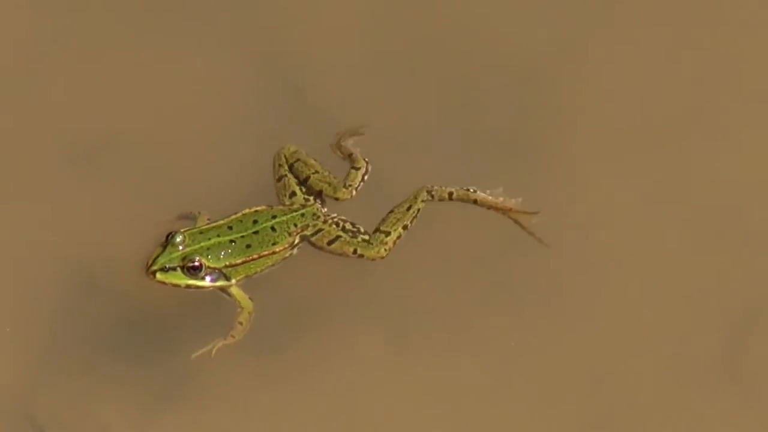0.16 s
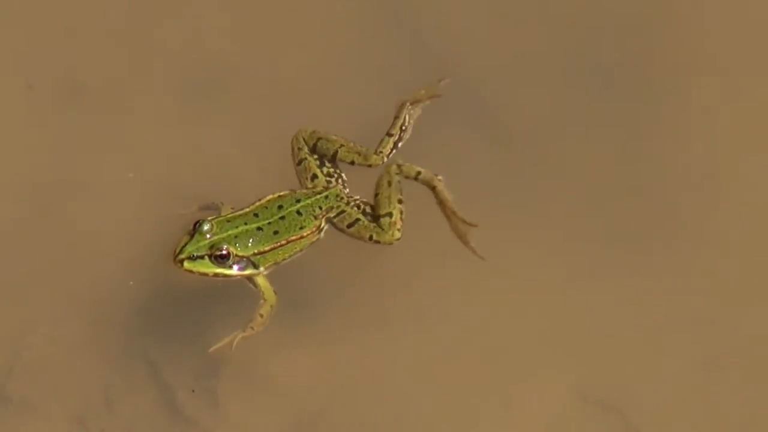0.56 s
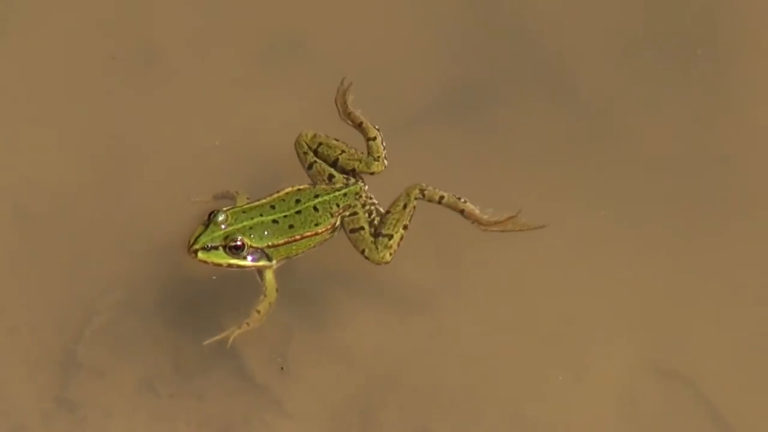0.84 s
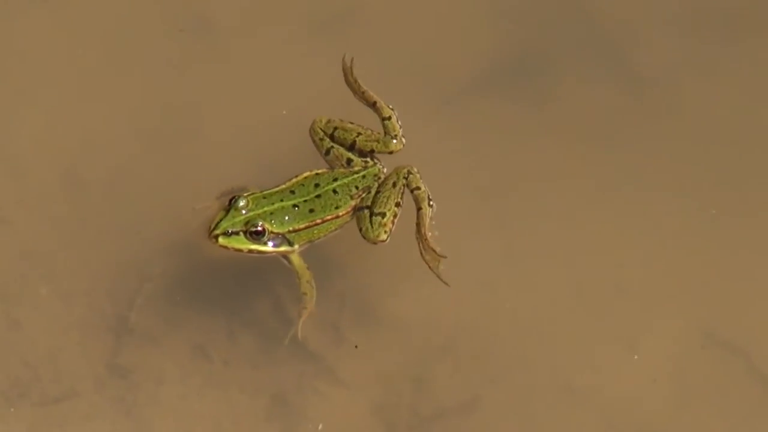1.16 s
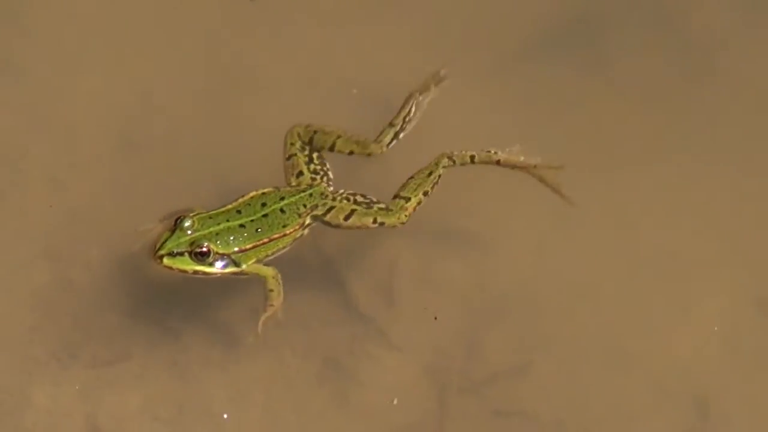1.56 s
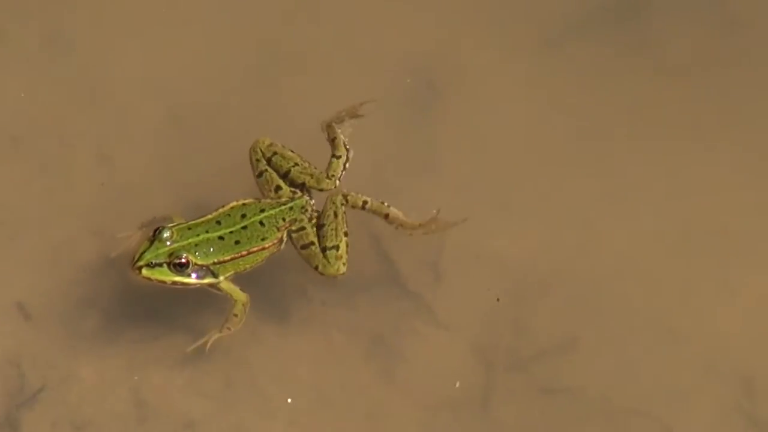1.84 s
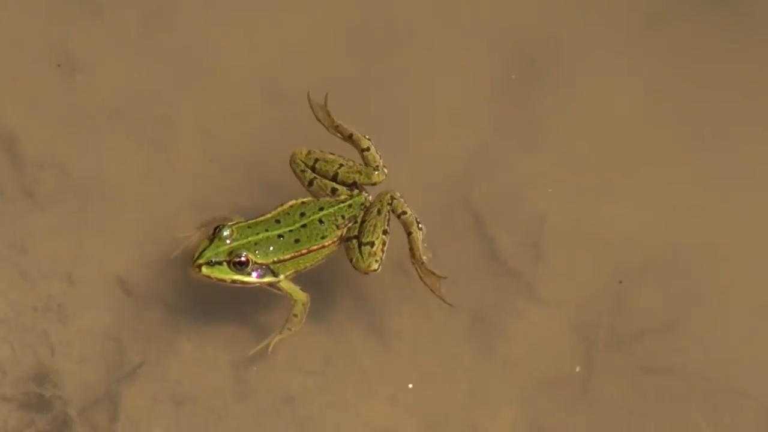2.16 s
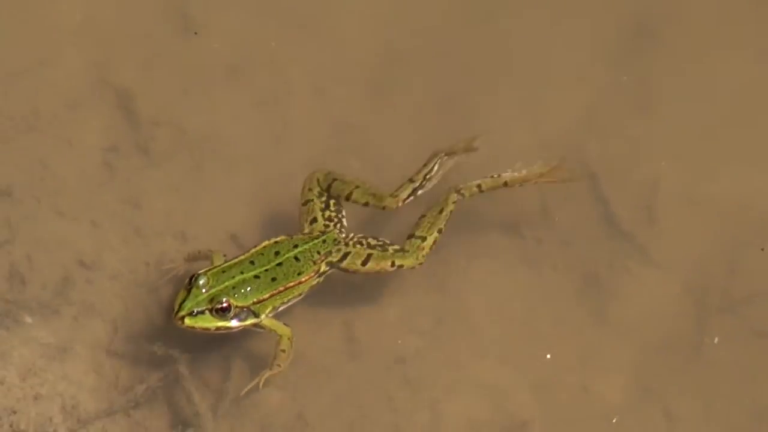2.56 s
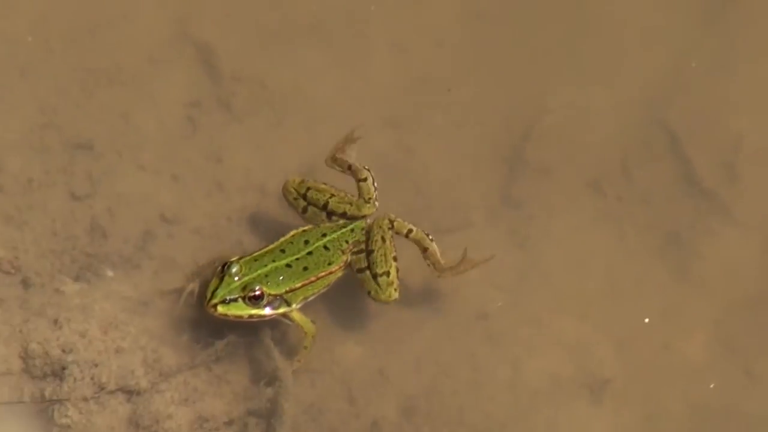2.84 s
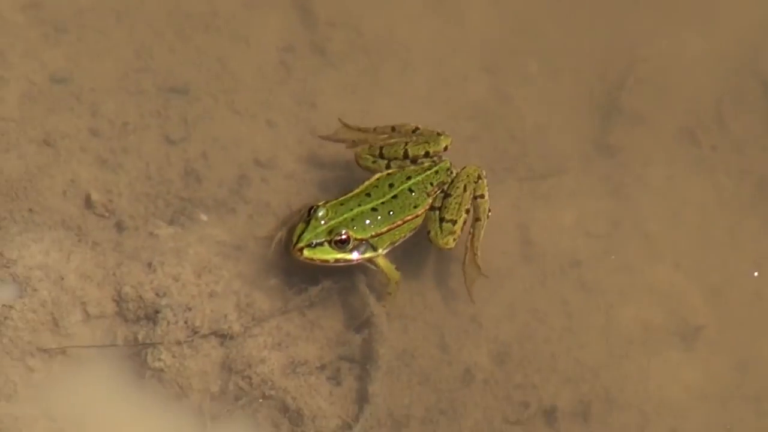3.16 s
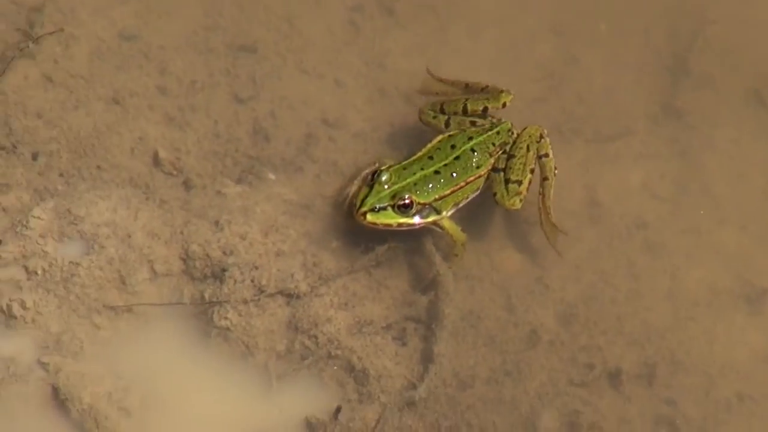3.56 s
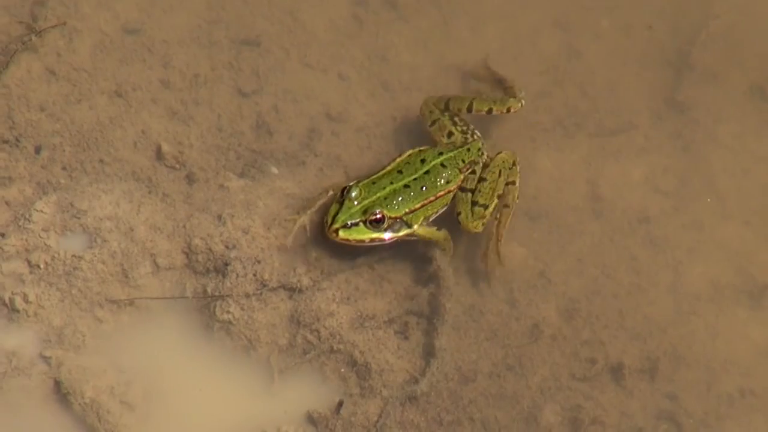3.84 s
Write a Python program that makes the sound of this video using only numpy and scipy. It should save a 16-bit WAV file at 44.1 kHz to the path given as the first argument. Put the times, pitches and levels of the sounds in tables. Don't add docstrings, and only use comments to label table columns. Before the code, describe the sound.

Frogs give short, low, rattling croaks at a pond while several birds whistle and twitter.

```python
import sys
import numpy as np
from scipy import signal
from scipy.fft import rfft, irfft
from scipy.io import wavfile
from scipy.ndimage import uniform_filter1d

SR = 44100
rng = np.random.default_rng(int(sys.argv[2]) if len(sys.argv) > 2 else 0)


def makeup_ratio(level_db):
    decades = np.asarray(level_db, float) / 20
    return 10 ** decades


def transcribe(signal):
    frames = np.atleast_2d(signal).T
    limited = np.clip(frames, -1, 1)
    pcm = np.round(limited * 32767).astype(np.int16)
    wavfile.write(sys.argv[1], SR, pcm)


N = 176400


def noise(hz, width):
    f = np.fft.rfftfreq(N, 1 / SR)
    bell = np.exp(-2 * ((f - hz) / width) ** 2)
    x = irfft(rfft(rng.standard_normal(N)) * bell, N)
    return x / x.std()


def frog(calls, lone, throat_db):
    # share of the sac pitch, t60/s, level/dB
    sac = [
        (0.991, 0.013, 3.5),
        (1.55, 0.008, -4),
        (0.592, 0.0076, -3),
    ]
    throat_hz, throat_t60_s = 550, 0.018
    open_s, close_s = 0.0015, 0.0008
    jitter, uneven_db = .04, 1.5

    pulses = [(s, f, db, db, N) for s, f, db in lone]
    for call in calls:
        when, rate_hz, sac_hz, db = np.array(call).T
        u = np.linspace(when[0], when[-1], 2000)
        turns = np.cumsum(np.interp(u, when, rate_hz)) * (u[1] - u[0])
        at = np.interp(turns[-1] - np.arange(int(turns[-1])), turns, u)
        progress = (at - when[0]) / (when[-1] - when[0])
        late = np.interp(progress, [.55, .7], [.3, 1])
        chance = rng.standard_normal((140, 2))[:len(at)].T * late
        starts = at + jitter * chance[0] / np.interp(at, when, rate_hz)
        levels = np.interp(at, when, db) + uneven_db * chance[1]
        stop = starts[0] + open_s
        pitches = np.interp(at, when, sac_hz)
        pulses += [(s, f, d, db.max(), stop) for s, f, d in zip(starts, pitches, levels)]

    out = np.zeros(N + 2048)
    ring_time = np.arange(2048) / SR
    for when, f, db, top_db, stop in pulses:
        i = int(when * SR)
        r = ring_time + (i + 1) / SR - when
        modes = [(share * f, t60, d) for share, t60, d in sac]
        modes.append((throat_hz, throat_t60_s, throat_db + (top_db - db) / 2))
        rings = sum(makeup_ratio(d - 60 * r / t60) * np.sin(2 * np.pi * hz * r) for hz, t60, d in modes)
        opening = 1 - np.exp(-(r / open_s) ** 2)
        shut = np.exp(-np.maximum(when + r - stop, 0) / close_s)
        out[i + 1:i + 2049] += 2 * makeup_ratio(db) * opening * rings * shut
    return signal.sosfilt(signal.butter(4, 494, "high", fs=SR, output="sos"), out[:N])


def left_frog():
    # t/s, pulse rate/Hz, sac f/Hz, level/dB
    calls = [
        [(1.92, 550, 1100, -60), (1.96, 570, 1128, -48), (1.982, 616, 1230, -32.5), (1.988, 351.5, 1070, -28.5),
         (2.002, 306, 1200, -30), (2.013, 198, 1450, -23)],
        [(2.058, 944, 960, -57.5), (2.12, 1010, 1000, -56), (2.14, 980, 990, -60), (2.19, 1057, 1043, -52)],
        [(2.335, 243.4, 800, -45), (2.39, 332, 1000, -41.5), (2.427, 387, 1150, -25.5), (2.44, 338, 1132, -26),
         (2.453, 335.8, 1333, -17), (2.477, 279.2, 1417, -28)],
        [(3.625, 225.2, 850, -60), (3.665, 349, 1036, -34), (3.7, 363.5, 1100, -22), (3.716, 328.6, 1250, -21),
         (3.726, 305.7, 1340, -16), (3.7475, 257, 1500, -20)],
    ]
    # t/s, sac f/Hz, level/dB
    lone = [
        (2.019, 1416, -31),
        (2.029, 1100, -33),
        (2.482, 1490, -24),
        (2.493, 1473, -25),
        (3.757, 1472, -22),
        (3.768, 1336, -27),
        (3.781, 1350, -37),
    ]
    return frog(calls, lone, -17)


def right_frog():
    # t/s, pulse rate/Hz, sac f/Hz, level/dB
    calls = [
        [(1.33, 220, 800, -44), (1.38, 239, 738, -39), (1.395, 246.4, 760, -32), (1.415, 224.4, 980, -34.5),
         (1.437, 191, 1070, -32)],
        [(2.61, 470, 950, -56), (2.68, 502, 999, -50), (2.7, 509, 990, -34), (2.708, 266.6, 1050, -31.5),
         (2.722, 200, 1170, -28), (2.733, 165, 1160, -31)],
    ]
    # t/s, sac f/Hz, level/dB
    lone = [
        (1.448, 1036, -34.5),
        (1.474, 1072, -47),
        (2.742, 1100, -32),
        (2.748, 1117, -39),
    ]
    return frog(calls, lone, -9)


def gate(t, start, end):
    edge_s = .008
    return np.clip((t - start) / edge_s + .5, 0, 1) - np.clip((t - end) / edge_s + .5, 0, 1)


def whistle(t, notes):
    slur_s, waver_hz, flutter_db = .008, 34, 2.2
    rows = np.array(notes)
    hz = np.interp(t, np.maximum.accumulate(rows[:, :2].ravel()), rows[:, 2:4].ravel())
    hz = uniform_filter1d(hz, int(slur_s * SR)) + waver_hz * noise(0, 82.2)
    loud = sum(makeup_ratio(db) * gate(t, start, end) for start, end, _, _, db in notes)
    loud = loud * makeup_ratio(flutter_db * noise(0, 140))
    return np.sqrt(2) * loud * np.sin(2 * np.pi * np.cumsum(hz) / SR)


def warbler(t):
    # start t/s, end t/s, from f/Hz, to f/Hz, level/dB
    melody = [(.0, 0.057, 2790, 2475, -52.5), (.525, .548, 1350, 1642, -65),
              (0.548, 0.641, 1642, 1762, -53.5), (0.661, 0.826, 1860, 1906, -52.5),
              (.99, 1.098, 2758, 2390, -50), (1.208, 1.378, 2370, 2353, -55.5),
              (1.56, 1.663, 2030, 1996, -66.5), (1.662, 1.682, 1347, 1850, -51.5),
              (1.7, 1.78, 1956, 1930, -55.5),
              (2.112, 2.155, 2240, 2330, -43), (2.15, 2.207, 2330, 2125, -37),
              (2.215, 2.32, 2230, 2332, -49), (2.33, 2.42, 1970, 1952, -47.5), (2.65, 2.72, 2130, 2300, -46),
              (2.72, 2.773, 2382, 2605, -41.5), (2.772, 2.791, 2650, 3015, -41),
              (2.79, 2.823, 2970, 2267, -37), (2.826, 2.879, 2278, 1892, -45),
              (3.22, 3.249, 2400, 2384, -49.5), (3.26, 3.399, 2236, 2117, -41.5),
              (3.4, 3.546, 2097, 2090, -48.5), (3.55, 3.703, 2005, 2110, -57)]
    return whistle(t, melody)


def trill(t, count=7):
    start_s, rate_hz, pitch_hz, sag_hz = 1.925, 47.3, 2520, 300
    k = (t - start_s) * rate_hz
    hz = pitch_hz - sag_hz * np.clip(k / (count - 1), 0, 1) ** 4
    pips = np.exp(-((k - np.round(k)) / 0.14) ** 2) * (k > -.5) * (k < count - .5)
    return makeup_ratio(-39) * pips * np.sin(2 * np.pi * np.cumsum(hz) / SR)


def right_bird(t):
    # start t/s, end t/s, from f/Hz, to f/Hz, level/dB
    song = [(.7, 0.734, 2900, 3200, -54.5), (0.715, 0.887, 3280, 3200, -55),
            (1.415, 1.45, 4110, 3200, -51.5), (1.438, 1.5, 3256, 3100, -48),
            (1.728, 1.795, 2867, 2550, -45.5), (1.8, 1.855, 2657, 2880, -46.5),
            (1.861, 1.94, 3250, 3250, -51.5), (2.065, 2.115, 3374, 3900, -44),
            (2.1, 2.125, 3937, 3374, -41), (2.197, 2.25, 3850, 3940, -43.5),
            (2.349, 2.359, 2800, 3000, -42), (2.365, 2.401, 3000, 2840, -41.5),
            (2.397, 2.428, 2870, 3070, -43), (2.508, 2.561, 3005, 2960, -46.5),
            (2.545, 2.587, 2970, 3480, -45.5), (2.588, 2.708, 3500, 3620, -53),
            (2.874, 2.926, 2765, 3000, -42), (3.009, 3.049, 3120, 2900, -48),
            (3.042, 3.117, 2920, 3460, -45.5), (3.565, 3.59, 2930, 2970, -38.5),
            (3.88, 3.934, 3910, 3900, -51)]
    return whistle(t, song)


def finch(t):
    # start t/s, end t/s, from f/Hz, to f/Hz, level/dB
    song = [(0.063, 0.108, 2534, 3150, -47), (0.103, 0.146, 3100, 2650, -48),
            (.152, 0.217, 2275, 2350, -47), (1.144, 1.188, 2556, 3164, -43),
            (1.191, 1.208, 3226, 2570, -41), (1.631, 1.672, 5226, 5400, -50.5),
            (1.681, 1.718, 3900, 4410, -43), (2.044, 2.162, 4810, 4880, -47.5),
            (2.155, 2.202, 4210, 4120, -47.5), (2.35, 2.432, 2500, 2517, -49),
            (3.345, 3.44, 1950, 1902, -55.5), (3.515, 3.614, 5250, 5290, -61)]
    return whistle(t, song)


def mid_bird(t):
    # start t/s, end t/s, from f/Hz, to f/Hz, level/dB
    song = [(0.353, .48, 4300, 4365, -77), (0.539, .6, 3970, 3610, -51.5), (0.594, .76, 3665, 3650, -53.5),
            (0.843, 1.083, 4290, 4294, -55.5), (1.276, 1.309, 4900, 4703, -49.5),
            (1.499, 1.564, 4370, 4190, -49), (2.894, 2.922, 4440, 4034, -47.5),
            (2.924, 2.973, 3993, 4052, -38.5), (3.005, 3.032, 4040, 4013, -41),
            (3.045, 3.121, 5120, 5096, -55.5), (3.229, 3.35, 4400, 4424, -51)]
    return whistle(t, song)


def high_bird(t):
    # start t/s, end t/s, from f/Hz, to f/Hz, level/dB
    song = [(0.393, 0.449, 6940, 7000, -62), (0.451, 0.505, 7050, 6950, -57.5),
            (.7, 0.776, 4650, 4650, -71), (0.851, .885, 4900, 4880, -52), (1.519, 1.592, 7600, 7490, -57.5),
            (1.6, 1.769, 6820, 7155, -55.5), (1.953, 2.004, 6520, 6250, -53),
            (2.351, 2.525, 7550, 6980, -59.5), (2.581, 2.7, 6500, 6370, -59.5),
            (2.93, 3.02, 4950, 4800, -55), (3.42, 3.454, 6110, 6020, -59.5),
            (3.466, 3.516, 6730, 6880, -59), (3.793, 3.808, 6320, 6550, -57),
            (3.805, 3.828, 6470, 6440, -52.5)]
    return whistle(t, song)


def chips(t):
    calls = [(.297, .033, 4800, 4250, -52), (.525, .015, 3300, 3900, -56), (.712, .025, 3000, 2750, -55),
             (.81, .027, 1450, 820, -48), (.849, .02, 5500, 3600, -52), (1.022, .03, 3900, 3400, -54),
             (1.088, .013, 2350, 1650, -52), (2.612, .025, 4900, 4000, -54), (2.738, .018, 4900, 4380, -51),
             (2.812, .025, 5000, 4600, -55), (3.255, .024, 5250, 4250, -51)]
    return whistle(t, [(s, s + length, from_hz, to_hz, db) for s, length, from_hz, to_hz, db in calls])


def buzzes(t):
    calls = [
        (.0, 0.34, 3030, 2536, -59),
        (0.872, 1.02, 3327, 1805, -59),
        (1.616, 1.703, 5130, 2187, -53.5),
        (1.917, 2.132, 4666, 1577, -54),
        (3.533, 3.636, 3627, 1710, -50.5),
        (3.883, 3.962, 4205, 1092, -53.5),
    ]
    throb = makeup_ratio(4 * noise(0, 110))
    sweep = np.array([noise(0, 70) for _ in range(3)])
    out = np.zeros(N)
    for start, end, hz, width, db in calls:
        phase = 2 * np.pi * np.cumsum(hz + 0.33 * width * sweep, axis=1) / SR
        voices = np.sin(phase).sum(axis=0) + 0.91 * noise(hz, width)
        out += makeup_ratio(db) * gate(t, start, end) * voices
    return throb * out


def far_birds(t, count=52):
    chance = rng.random((count, 4))
    start = (np.arange(count) + 0.26 * chance[:, 0]) * N / SR / count
    end = start + 0.014 + 0.044 * chance[:, 2]
    hz = 4500 * np.exp(.6 * (chance[:, 1] - .7))
    end_hz = hz * (1.04 - .2 * chance[:, 3] ** 2)
    level_db = -68 + 5 * chance[:, 0] + 2 * start
    return whistle(t, list(zip(start, end, hz, end_hz, level_db)))


def placed(x, pan_db, wet_db, t60):
    t = np.arange(SR // 2) / SR
    tail = rng.standard_normal(len(t)) * makeup_ratio(-60 * t / t60) * np.minimum(t / 0.014, 1)
    x = x + makeup_ratio(wet_db) * signal.fftconvolve(x, tail / np.linalg.norm(tail))[:N]
    return x * makeup_ratio(np.array([[pan_db], [-pan_db]]) / 2)


def coloured(*curves):
    f = np.log(np.fft.rfftfreq(N, 1 / SR) + 1)
    db = sum(np.interp(f, np.log(np.array(c)[:, 0]), np.array(c)[:, 1]) for c in curves)
    return irfft(rfft(rng.standard_normal(N)) * makeup_ratio(db), N)


def air():
    # f/Hz, level/dB
    colour = [(20, -20), (60, 2.5), (150, -2), (450, -14.5), (1700, -17), (8000, -25.5), (15700, -30),
              (15900, -72)]
    # f/Hz, side against middle level/dB
    spread = [(40, -23), (300, -1.5), (1500, -7), (9000, -3), (11200, -14), (11600, -29)]
    # f/Hz, width f/Hz, level/dB
    drones = [
        (126.9, 4.6, -55.5),
        (644, 91, -66),
        (1100, 203, -59),
        (2400, 980, -62),
        (3430, 2640, -54),
    ]
    mid, side = coloured(colour), coloured(colour, spread)
    far = np.zeros(N)
    for hz, width, db in drones:
        swell_db = (hz > 2000) * np.linspace(-5, 0, N)
        far += makeup_ratio(db + 1.2 * noise(0, 3.0) + swell_db) * noise(hz, width)
    around = makeup_ratio(-48.5) / mid.std() * (mid + side * np.array([[1], [-1]]))
    return around + far * makeup_ratio(np.array([[.9], [-.9]]))


def scene():
    t = np.arange(N) / SR
    frogs = [(left_frog(), 2.5), (right_frog(), -6)]
    birds = [(warbler(t) + trill(t), 1.5),
             (right_bird(t) + finch(t), -8.5),
             (mid_bird(t) + far_birds(t), 2.5),
             (high_bird(t), 5.5),
             (chips(t) + far_birds(t), -7),
             (buzzes(t), -6.5)]
    bank = sum(placed(x, pan_db, wet_db=-11.5, t60=0.28) for x, pan_db in frogs)
    trees = sum(placed(x, pan_db, wet_db=-5, t60=.65) for x, pan_db in birds)
    return bank + trees + air()


def low_pass(x):
    return signal.sosfilt(signal.butter(12, 16890, fs=SR, output="sos"), x)


def record(dry):
    return low_pass(dry)


dry = scene()
out = record(dry)
transcribe(out)
```